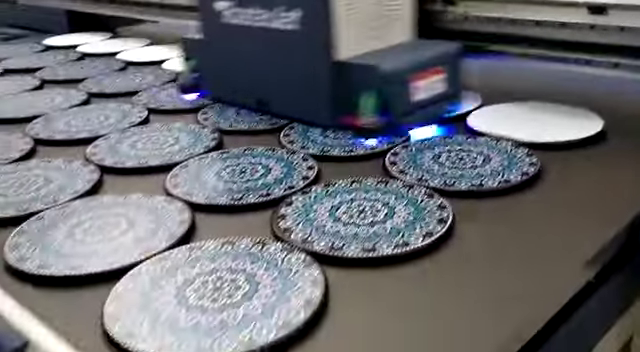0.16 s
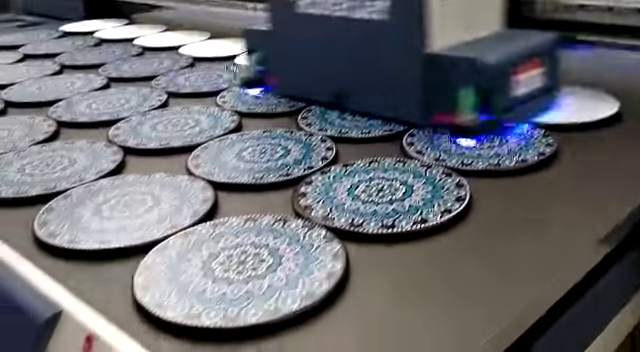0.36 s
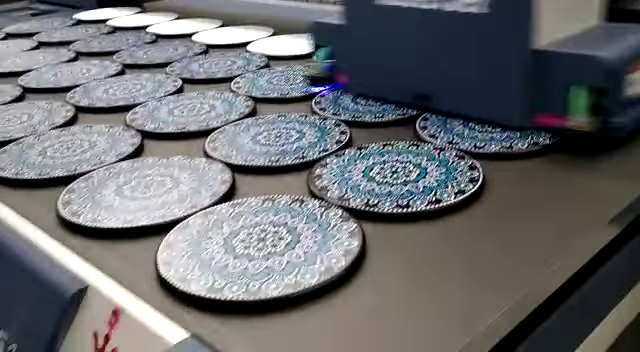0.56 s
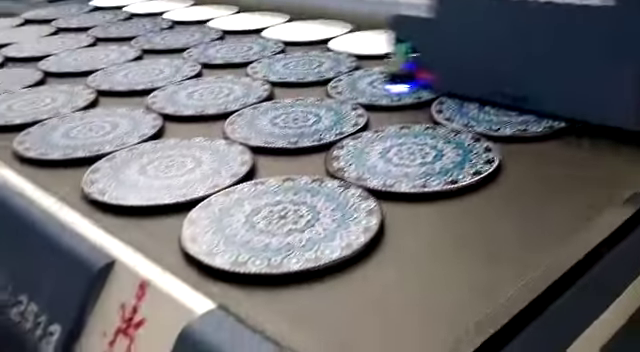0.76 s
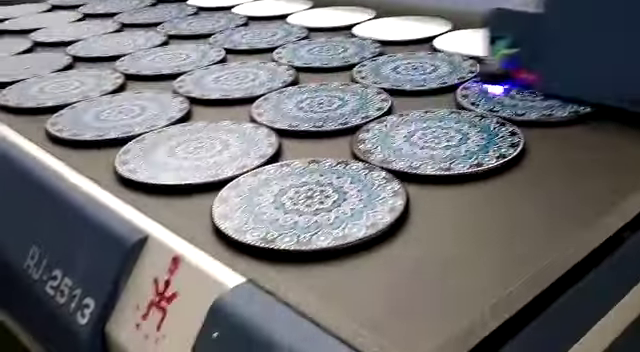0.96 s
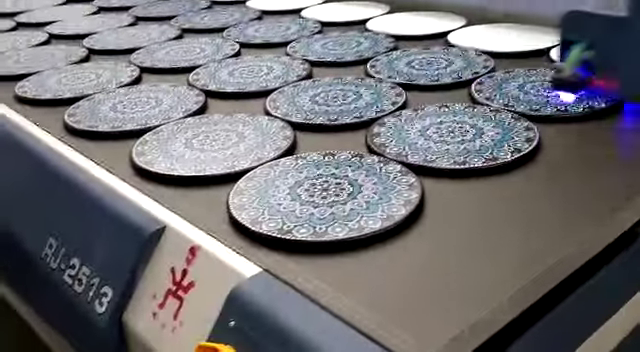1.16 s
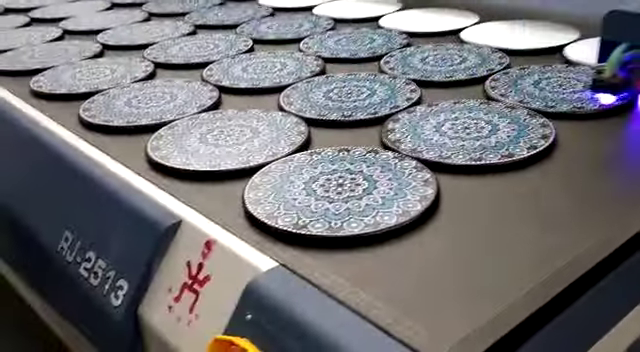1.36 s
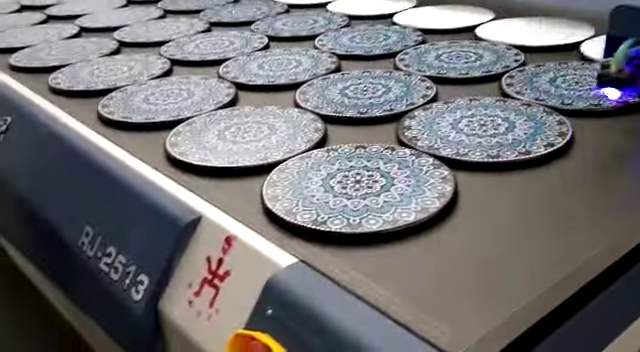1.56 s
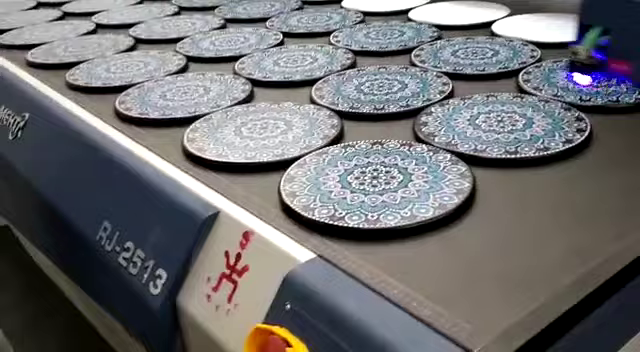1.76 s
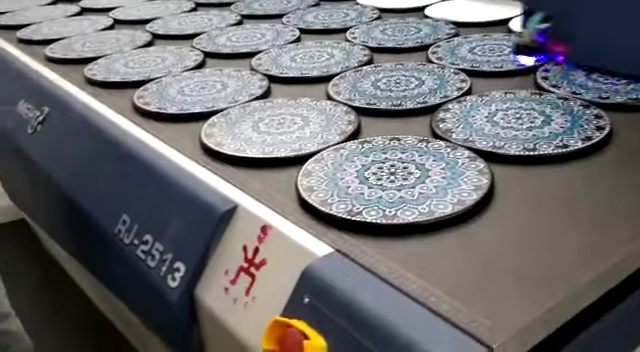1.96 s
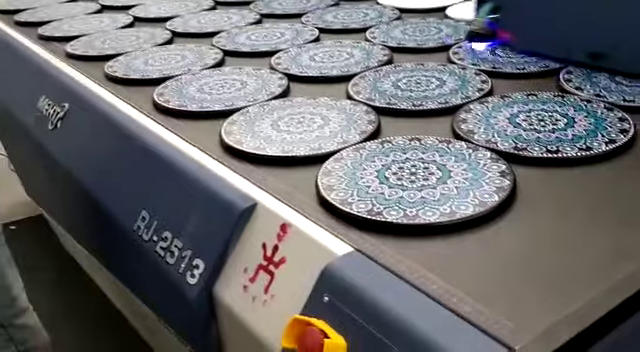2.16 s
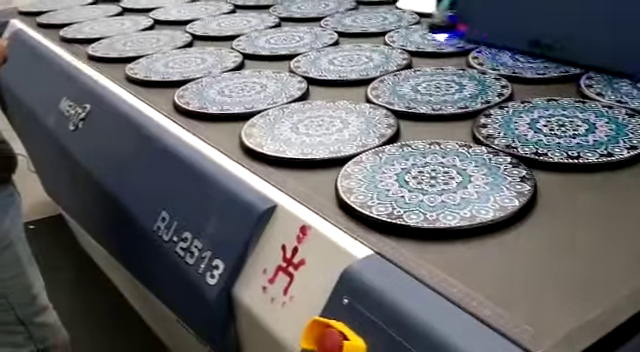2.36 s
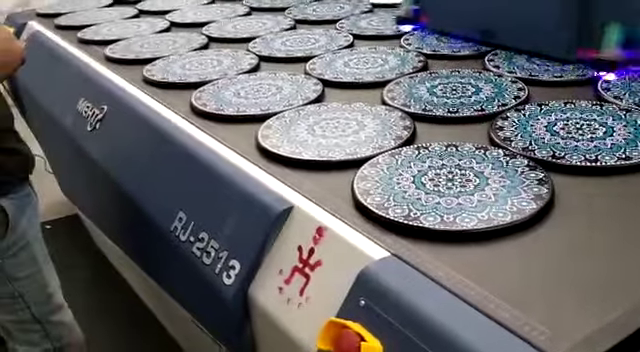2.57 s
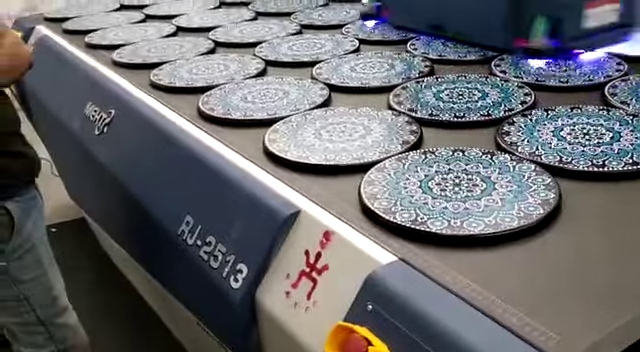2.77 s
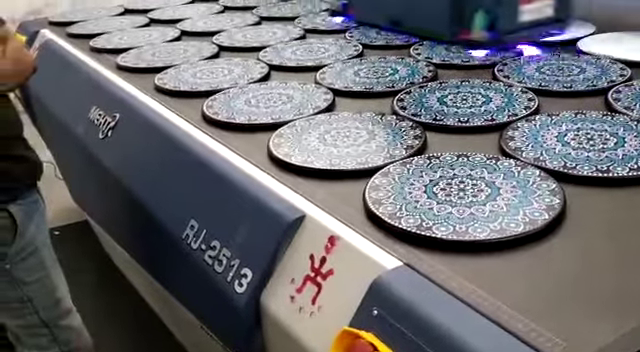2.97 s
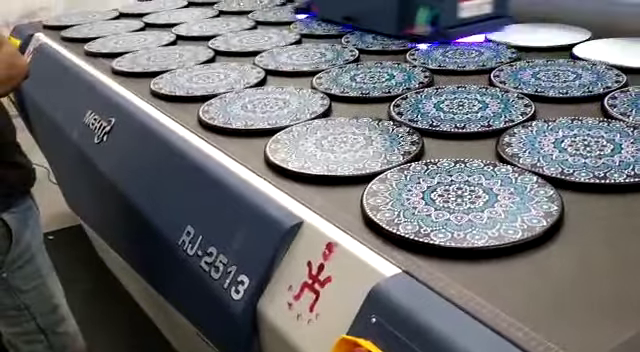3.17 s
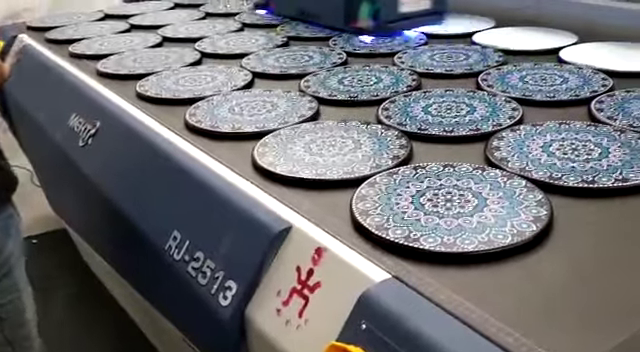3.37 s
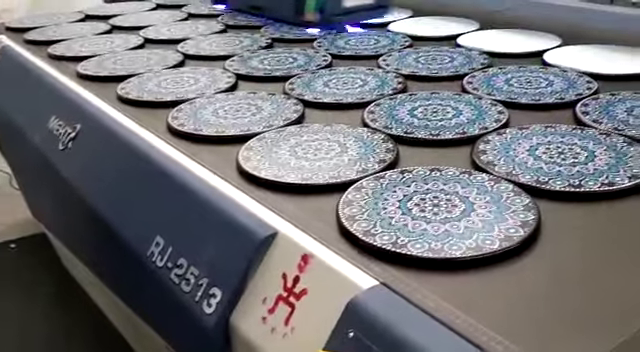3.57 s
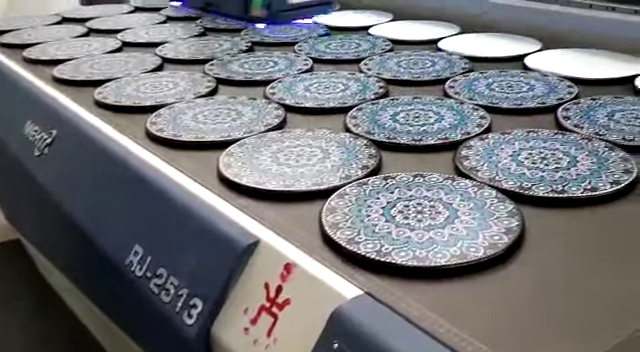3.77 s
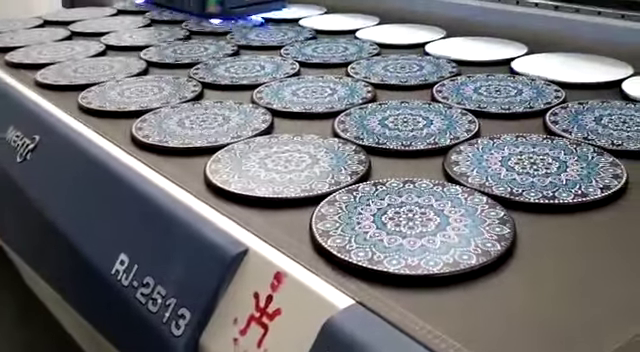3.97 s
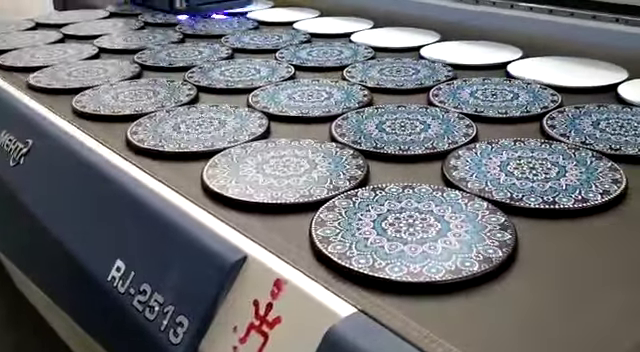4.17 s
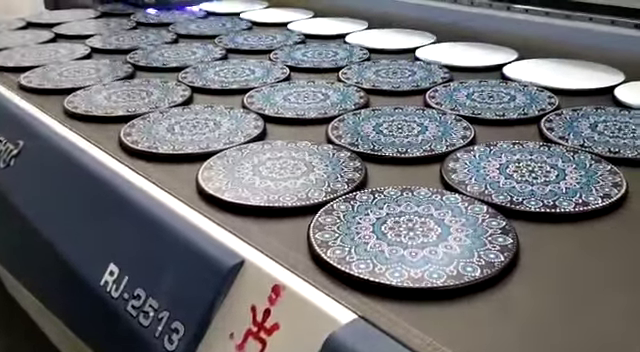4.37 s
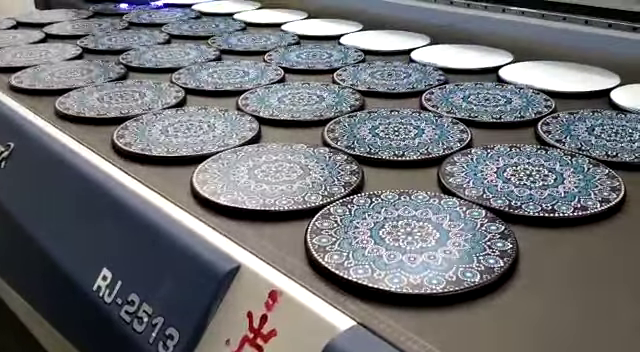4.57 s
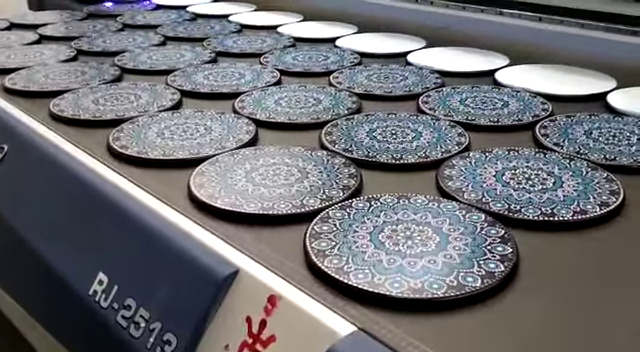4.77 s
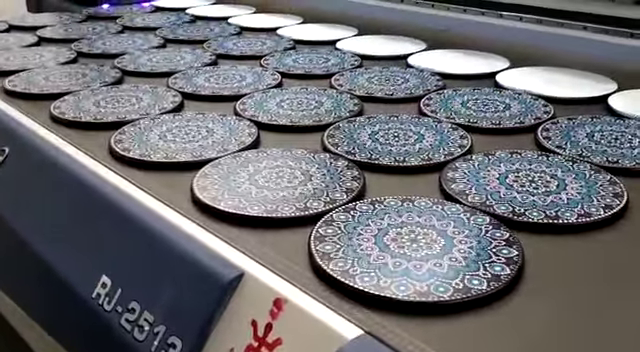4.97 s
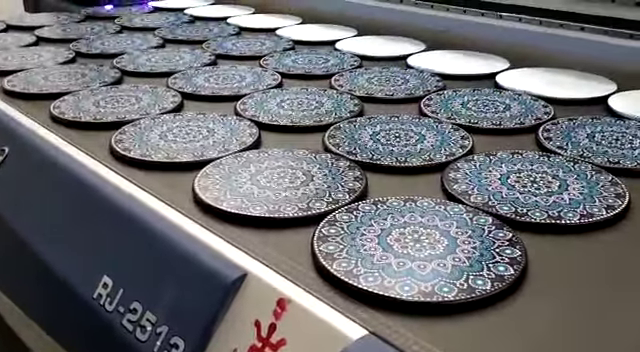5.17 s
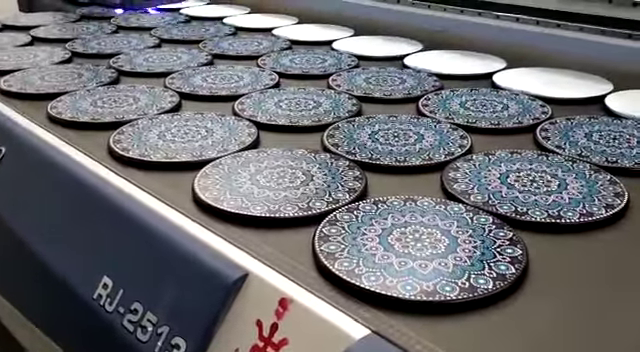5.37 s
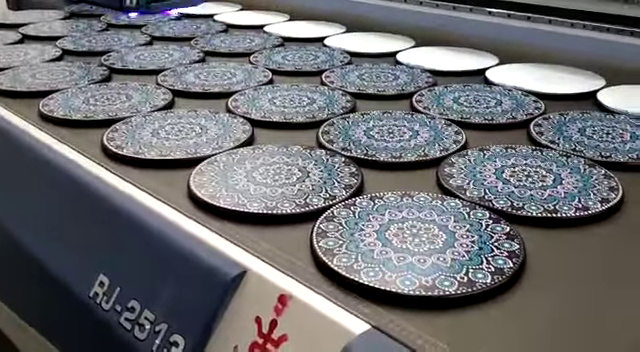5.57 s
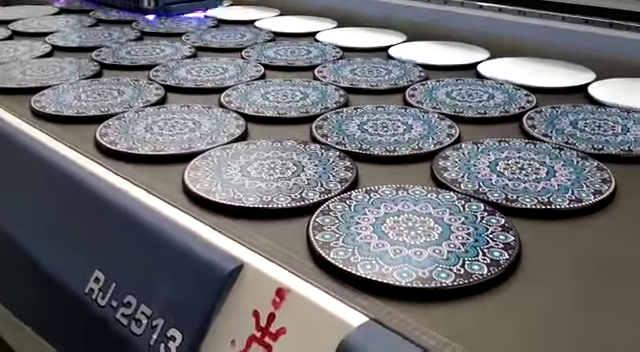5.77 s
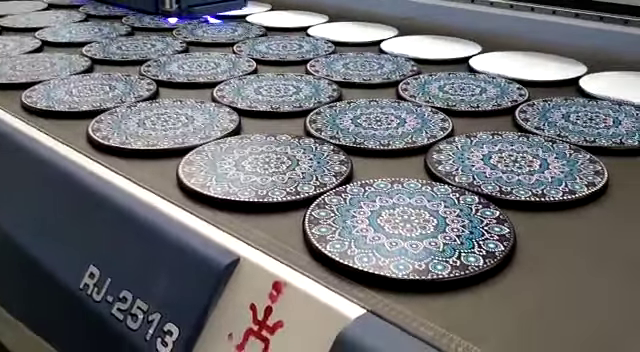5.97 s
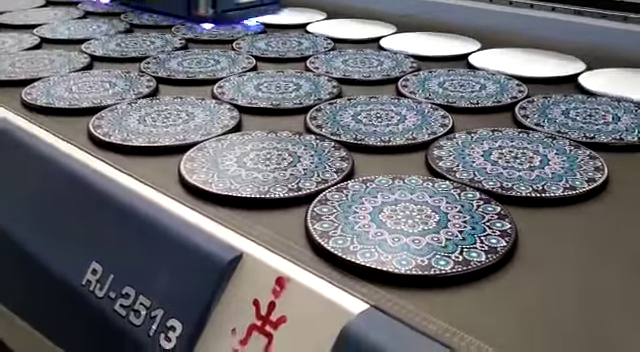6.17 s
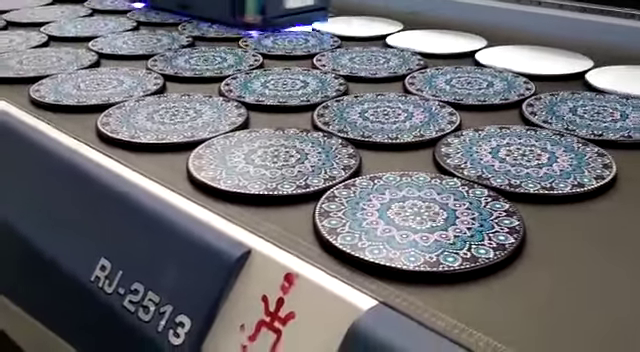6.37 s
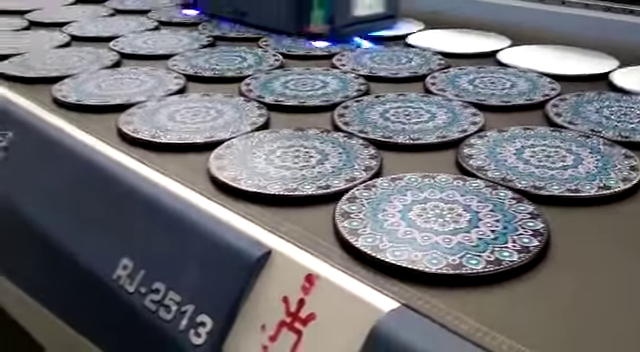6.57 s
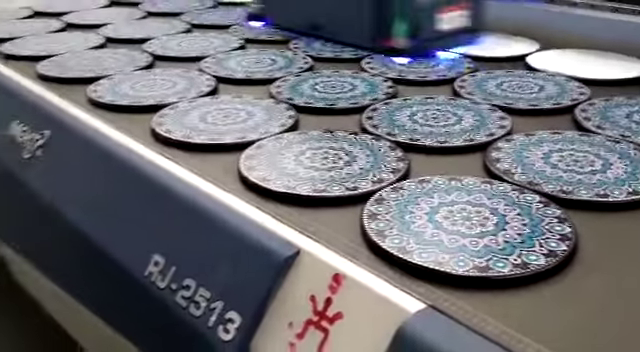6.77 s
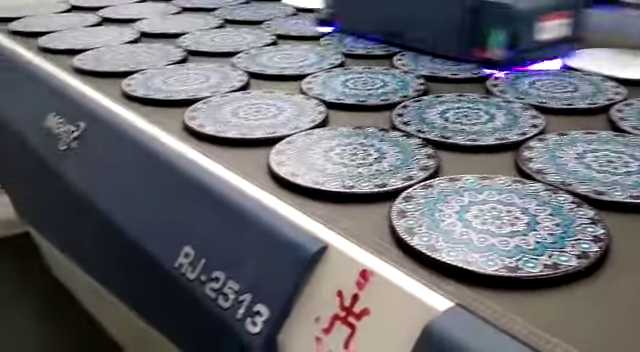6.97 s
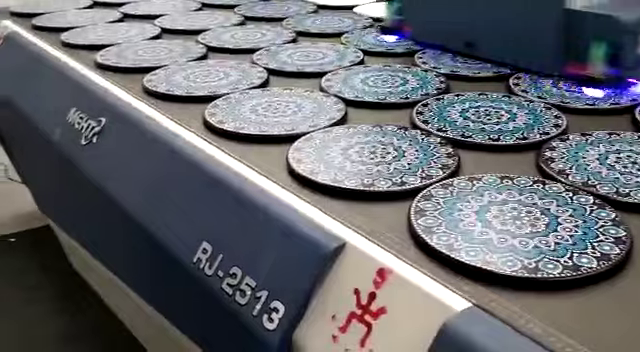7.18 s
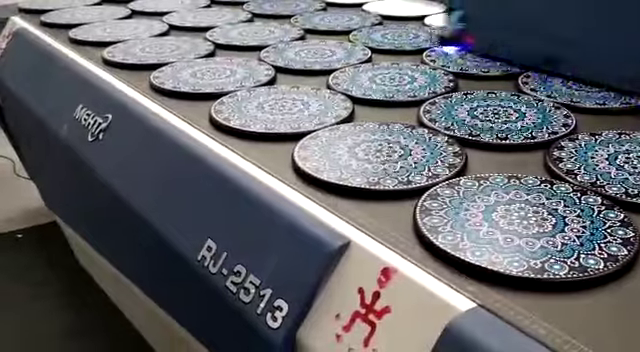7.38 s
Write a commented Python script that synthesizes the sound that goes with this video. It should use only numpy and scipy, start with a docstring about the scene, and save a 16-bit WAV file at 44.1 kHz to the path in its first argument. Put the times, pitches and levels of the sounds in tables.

```python
"""A hum near 400 Hz under bright hiss: a flatbed printer's carriage runs along its rail, slows,
turns round and comes back, indoors. Belt teeth make the hum as tones that follow carriage speed;
rolling guide blocks, cable chain and frame are shaped or resonant noise that follows it too.
An inverter whines as tones one mains frequency apart; a vacuum blower drones below, in air noise
and low lines. Dull thuds and a tiny bright tick are single events."""
import sys
import numpy as np
from scipy import signal
from scipy.fft import rfft, irfft, next_fast_len
from scipy.io import wavfile

SR = 44100
rng = np.random.default_rng(int(sys.argv[2]) if len(sys.argv) > 2 else 0)


def nominal_scale(level):
    """Amplitude ratio for a level in decibels (scalar or array-like)."""
    x = np.asarray(level, float) / 20
    return 10 ** x


def persist_wave(psi):
    """Save psi, clipped to +-1, as 16-bit WAV."""
    counts = np.round(np.clip(psi, -1, 1) * 32767).astype(np.int16)
    wavfile.write(sys.argv[1], SR, np.atleast_2d(counts).T)


N = 327663


def rms_one(x):
    """Scale to rms 1."""
    return x / np.sqrt(np.mean(x ** 2) + 1e-20)


def in_time(rows):
    """Columns of a curve table (t/s first), one value a sample."""
    t_s, *columns = np.transpose(rows)
    return [np.interp(np.arange(N) / SR, t_s, column) for column in columns]


def swells(rows):
    """Sum of Gaussian gain bumps, one per row: t/s, level/dB, half length/s."""
    t = np.arange(N) / SR
    return sum(nominal_scale(db) * np.exp(-((t - at_s) / half_s) ** 2) for at_s, db, half_s in rows)


def drift(rate_hz):
    """Slow chance of spread 1: coarse noise through a double one-pole low-pass."""
    step = 40  # samples per coarse value
    r = np.exp(-2 * np.pi * rate_hz * step / SR)
    noise = rng.standard_normal(N // step + 4002)
    slow = signal.lfilter([1], [1, -2 * r, r * r], noise)[4000:]
    # 4000 coarse values of run-in are dropped
    return np.interp(np.arange(N) / step, np.arange(len(slow)), rms_one(slow - slow.mean()))


def tone(hz):
    """A sine of rms 1 on a steady or moving pitch, random start phase."""
    cycles = np.cumsum(hz * np.ones(N)) / SR
    return np.sqrt(2) * np.sin(2 * np.pi * (cycles + rng.random()))


def shaped(x, spectrum):
    """Filter by a curve of dB on log frequency."""
    size = next_fast_len(N)
    hz, level_db = np.transpose(spectrum)
    log_hz = np.log(np.arange(size // 2 + 1) * SR / size + 1)
    gain = nominal_scale(np.interp(log_hz, np.log(hz), level_db))
    return irfft(rfft(x, size) * gain, size)[..., :N]


def coloured(spectrum):
    """Noise shaped to a spectrum; rms 1."""
    return rms_one(shaped(rng.standard_normal(N), spectrum))


def resonance(x, hz, width_hz):
    """Two-pole resonance, gain 1 on top."""
    r = np.exp(-np.pi * max(width_hz, 2) / SR)
    poles = [1, -2 * r * np.cos(2 * np.pi * hz / SR), r * r]
    return signal.lfilter([(1 - r * r) / 2, 0, (r * r - 1) / 2], poles, x)


def ringing(white, hz, width_hz):
    """Noise twice through one resonance; rms 1."""
    once = resonance(white, hz, width_hz)
    return rms_one(resonance(once, hz, width_hz))


# turns, near end then far end: braking starts t/s, standstill t/s, full speed again t/s
TURN_TIMES = [(.99, 1.599, 2.12), (4.5, 5.1, 5.6)]


def motion():
    """Speed 0-1 on smooth ramps, heading (1 away) and place on the rail (0 near, 1 far)."""
    t, speed, away = np.arange(N) / SR, 1, 0
    for brake_s, stop_s, full_s in TURN_TIMES:
        ramp = np.interp(t, [brake_s, stop_s, full_s], [1, 0, 1])
        speed = speed * np.sin(np.pi / 2 * ramp) ** 2
        away = np.abs(away - (t > stop_s))
    place = np.cumsum(speed * (2 * away - 1))
    return speed, away, (place - place.min()) / np.ptp(place)


def level(full_db, still_db, away_db, far_db, lumpy_db):
    """Layer gain: rolling grows with speed over a standstill floor; heading, place and chance shift it."""
    speed, away, place = motion()
    rolling = nominal_scale(full_db + away_db * away) * speed ** 1.58
    return np.hypot(rolling, nominal_scale(still_db)) * nominal_scale(far_db * place + lumpy_db * drift(5))


TOOTH_HZ = 400.2  # tooth rate at full speed, before flutter
SAG_S, SAG_HALF_S, SAG_SHARE = 5.645, 0.03454, 0.084  # speed sags briefly after the far start
# tooth tone before radiation and dips: t/s, level/dB
TOOTH_CURVE = [(0, -29.5), (.55, -24), (.8, -28.5), (1.1, -24), (2.05, -29.5), (2.4, -31.5), (2.7, -31),
               (3.5, -32), (4.05, -38.5), (4.55, -30), (5.57, -28.5), (6.0, -32), (6.4, -28.5),
               (6.6, -30.5), (7.0, -30), (7.12, -34), (7.43, -37)]
# housing radiates the tone only near full speed: f/Hz, gain/dB
HOUSING_RADIATION = [(10, -56.5), (250, -37), (325, -19), (350, -0.5), (385, -0.5), (400, 1)]
# brief changes of tooth tone level, mostly dips: t/s, change/dB, half length/s
TOOTH_DIPS = [(0.77, -7.5, 0.032), (0.914, -13, .015), (0.996, -14, 0.027), (1.08, -5.5, .012),
              (2.152, -6, 0.033), (2.398, -5, .05), (2.892, -8, 0.021), (4.34, -5, 0.017),
              (4.45, -10, 0.024), (4.582, -19, .015), (5.486, -17, 0.043), (5.65, -4, 0.013),
              (5.76, 0, 0.023), (6.583, -1, .05)]
# tooth harmonics: multiple of tooth rate, level re tooth tone/dB
TOOTH_HARMONICS = [(2, -25.5), (3, -28.5), (4, -32)]


def belt():
    """Teeth mesh at a rate set by speed; pitch and level flutter more below full speed."""
    hz = TOOTH_HZ * motion()[0] * (1 - SAG_SHARE * swells([(SAG_S, 0, SAG_HALF_S)]))
    tone_db = in_time(TOOTH_CURVE)[0] + np.interp(hz, *np.transpose(HOUSING_RADIATION))
    t = np.arange(N) / SR
    for at_s, change_db, half_s in TOOTH_DIPS:
        tone_db = tone_db + change_db * np.exp(-((t - at_s) / half_s) ** 2)
    unsteady = np.clip((hz.max() - hz) / 30, 0, 1)  # 1 from 30 Hz below top rate
    hz = hz * (1 + (.0012 + .006 * unsteady) * drift(14))
    out = nominal_scale(tone_db + (1.36 + 0.92 * unsteady) * drift(9)) * tone(hz)
    for multiple, under_db in TOOTH_HARMONICS:
        out += nominal_scale(tone_db + under_db + 1.1 * drift(34)) * tone(multiple * hz)
    return out


# guide block hiss, shape only: f/Hz, density/dB
HISS_SPECTRUM = [(1650, -67), (2800, -38), (5260, -18), (5900, -11), (6300, -4), (7330, 5), (7840, -1),
                 (8500, -26), (8700, -53), (11300, -66.5), (19100, -120)]


def guide_hiss():
    """Rolling guide blocks: bright noise with a fine level flutter."""
    gain = level(full_db=-27, still_db=-38, away_db=0, far_db=1, lumpy_db=.5)
    flutter = nominal_scale(0.56 * drift(12) + 0.29 * drift(88))
    return gain * flutter * coloured(HISS_SPECTRUM)


# broad rattle, shape only: f/Hz, density/dB
RATTLE_SPECTRUM = [(530, -36), (900, -3.5), (1160, 3), (1310, -3), (1470, -1), (1540, -5), (1700, -17),
                   (2210, -31), (3740, -120)]
# rail resonances: f/Hz, width of each of two passes/Hz, level outward/dB, level inward/dB (re broad rattle)
RAIL_MODES = [(1125, 30, -6, -17), (1200, 22, -11, -13), (1435, 8, -13, -13), (1490, 10, -11, -25),
              (1546, 16, -14, -17), (1598, 12, -13, -24)]
# a thin rail tone stands out: t/s, level/dB, half length/s
RAIL_TONE_SWELLS = [(.38, -51.5, 0.29)]


def rail_rattle():
    """Guide blocks rattle the rail; the two directions load different resonances."""
    away = motion()[1]
    white = rng.standard_normal(N)
    rattle = coloured(RATTLE_SPECTRUM)
    for hz, width_hz, out_db, in_db in RAIL_MODES:
        mode_db = away * out_db + (1 - away) * in_db + 1.5 * drift(2.6)
        rattle = rattle + nominal_scale(mode_db) * ringing(white, hz, width_hz)
    gain = level(full_db=-44.5, still_db=-51.5, away_db=3.5, far_db=0, lumpy_db=1.0)
    return gain * rms_one(rattle) + swells(RAIL_TONE_SWELLS) * tone(1450 + 1.5 * drift(5.6))


def drive_whine():
    """Carriage drive: one high tone, amplitude proportional to speed."""
    full_speed_db = -45 + 1.5 * drift(1.1)
    return nominal_scale(full_speed_db) * motion()[0] * tone(7584)


# broad chain noise, shape only: f/Hz, density/dB
CHAIN_SPECTRUM = [(940, -27), (1600, 0), (1820, -6), (1940, -8), (2280, -14.5), (2700, -12.5), (3510, -42),
                  (5940, -120)]
# narrow noise lines of the chain, unevenly spaced: f/Hz, width/Hz, level re broad noise/dB
CHAIN_LINES = [(1720, 15, -4.5), (1875, 7.9, -8.5), (1995, 16, -8.5), (2120, 15, -13.5)]
# clatter bursts: t/s, level/dB, half length/s
CHAIN_CLATTER = [(4.07, -48, .05), (5.65, -47.5, 0.12)]


def cable_chain():
    """The unrolling chain: broad noise plus narrow noise lines, with bursts of clatter."""
    white = rng.standard_normal(N)
    noise = coloured(CHAIN_SPECTRUM)
    for hz, width_hz, line_db in CHAIN_LINES:
        noise = noise + nominal_scale(line_db + 1.8 * drift(2.3)) * rms_one(resonance(white, hz, width_hz))
    rolling = level(full_db=-54, still_db=-63, away_db=-2.5, far_db=4, lumpy_db=1.4)
    return np.hypot(rolling, swells(CHAIN_CLATTER)) * rms_one(noise)


# frame rumble, shape only: f/Hz, density/dB
RUMBLE_SPECTRUM = [(100, -40.5), (170, -16.5), (260, -9), (340, -14.5), (430, -3.5), (480, -10.5),
                   (630, -9.5), (790, -15), (870, -17.5), (1100, -14.5), (1430, -49), (2400, -120)]


def frame_rumble():
    """The frame rumbles: low shaped noise."""
    gain = level(full_db=-38, still_db=-36.5, away_db=-7, far_db=-5, lumpy_db=1.5)
    return gain * coloured(RUMBLE_SPECTRUM)


GANTRY_HZ = 359.6
RING_SHARE = .45  # part of jolt power that is a clear gantry tone
# bed booms as the carriage passes near: t/s, level/dB, half length/s
BED_BOOMS = [(.18, -45.5, .05), (.39, -39, 0.035), (.91, -36, 0.056), (6.89, -40.5, 0.038),
             (7.31, -37, 0.097)]
# gantry jolts in braking and starting: t/s, level/dB, half length/s
GANTRY_JOLTS = [(1.11, -33, .03), (1.28, -37, 0.022), (1.37, -37, 0.061), (2.03, -34, 0.034),
                (4.62, -28, 0.031), (4.7, -33, .03), (4.77, -33, .04), (5.33, -36, .04),
                (5.46, -35.5, 0.047), (5.63, -30, 0.057)]


def frame_modes():
    """Noise twice through each frame resonance; jolts ring the gantry and shake the cover."""
    white = rng.standard_normal(N)
    jolts = swells(GANTRY_JOLTS)
    bed = level(full_db=-45, still_db=-60.5, away_db=-6.5, far_db=-8.5, lumpy_db=0)
    gantry = level(full_db=-40.5, still_db=-42, away_db=-5, far_db=-3, lumpy_db=2)
    cover = level(full_db=-44.5, still_db=-46.5, away_db=-0.5, far_db=0.5, lumpy_db=1.5)
    out = np.hypot(bed, swells(BED_BOOMS)) * ringing(white, hz=204, width_hz=11)
    out += np.hypot(gantry, np.sqrt(1 - RING_SHARE) * jolts) * ringing(white, GANTRY_HZ, width_hz=64)
    out += np.hypot(cover, nominal_scale(-7) * jolts) * ringing(white, hz=761, width_hz=144)
    return out + np.sqrt(RING_SHARE) * jolts * tone(GANTRY_HZ + 16 * drift(8))


MAINS_HZ = 50.07
STEADY_SHARE, FADE_HZ = 0.77, 1.3  # steady part of each tone's power; rate of the fading rest
# switching frequency: t/s, f/Hz
CARRIER_CURVE = [(0, 6401.8), (1.5, 6403.2), (4, 6404.0), (7.43, 6403.6)]
# whine at the moving listener, two tone sets take turns:
# t/s, common level/dB, balance/dB, tilt to upper tones/dB per sideband
WHINE_CURVE = [(0, -27.5, 5, -2.5), (.2, -31.5, -1, 0), (.38, -27, -3.5, -0.5), (.75, -35, -2.5, -2),
               (1.05, -29.5, 0.5, 1.5), (1.35, -26.5, -1.5, 0.5), (1.63, -32.5, -8, 0), (2.0, -34, -0.5, 1),
               (2.4, -31, 8, 0), (2.9, -32.5, -3, -1.5), (3.15, -31, 1, 1.5), (3.55, -35, 1.5, 1),
               (3.95, -32, 1.5, 1.5), (4.3, -34, -1.5, 2), (4.75, -37, 5.5, -0.5), (5.2, -33.5, 7.5, -1.5),
               (5.5, -34.5, 7.5, -1.5), (5.85, -34.5, 5, -1.5), (6.1, -33, 5, .5), (6.5, -29.5, -2.5, 0),
               (6.9, -34, -1.5, -1), (7.43, -31.5, -2, -1)]
# strong tones: mains multiples off carrier, level re common/dB, share of balance taken
STRONG_SIDEBANDS = [(-3, -15.5, 0), (-2, -6.5, -1.2), (-1, -7.5, 0.79), (0, -15, -0.15), (1, -6.5, 0.6),
                    (2, -5.5, 0.83), (3, -9, -0.92)]
# weak tones of the comb: f/Hz, rms level/dB
WEAK_TONES = [(6053, -57), (6103, -53), (6153, -54), (6203.2, -50), (6603.7, -46), (6653.8, -53),
              (6704, -55)]
# another switching tone: f/Hz, rms level/dB
OTHER_SWITCHING = [(8000, -58)]


def inverter():
    """Switching carrier with sidebands at mains multiples; room echoes fade each strong tone alone."""
    carrier_hz, = in_time(CARRIER_CURVE)
    whine_db, balance_db, tilt_db = in_time(WHINE_CURVE)
    out = np.zeros(N)
    loose = np.sqrt((1 - STEADY_SHARE) / 2)
    for k, level_db, taken in STRONG_SIDEBANDS:
        fade = np.hypot(np.sqrt(STEADY_SHARE) + loose * drift(FADE_HZ), loose * drift(FADE_HZ))
        tone_db = whine_db + level_db + taken * balance_db + k * tilt_db
        out += nominal_scale(tone_db) * fade * tone(carrier_hz + k * MAINS_HZ)
    for hz, level_db in WEAK_TONES + OTHER_SWITCHING:
        out += nominal_scale(level_db + 2.3 * drift(0.77)) * tone(hz)
    return out


# rotor and mains lines; walking along the table changes the balance:
# f/Hz, rms level at first/dB, rms level at last/dB, twice the pitch spread/Hz
DRONE_LINES = [(47.7, -37, -36, .5), (75.5, -54, -52.5, 5.0), (99.3, -60, -48.5, 1.7),
               (147.1, -55.5, -50.5, 1.6), (197.4, -63.5, -58.5, 2.5), (297.3, -43.5, -51.5, 6.0),
               (372, -52.5, -54.5, 4.5), (525.6, -50.5, -53, 3.86)]
# workshop air and blower, shape only: f/Hz, density/dB
AIR_SPECTRUM = [(24, -30), (40, -0.5), (69, -6), (107, -8.5), (188, -10), (301, -12.5), (564, -7),
                (706, -10), (903, -5), (1690, -22.5), (3170, -29), (5680, -19), (6490, -7.5), (7600, -30.5),
                (8500, -41), (11000, -68), (18700, -120)]
# air noise: t/s, rms level/dB
AIR_CURVE = [(0, -38), (1.6, -39.5), (3, -39), (4.6, -38.5), (5.4, -37.5), (6.2, -40), (7.43, -41)]


def blower():
    """Broad air noise under a few low, wavering rotor and mains lines."""
    out = nominal_scale(in_time(AIR_CURVE)[0]) * coloured(AIR_SPECTRUM)
    for hz, first_db, last_db, waver_hz in DRONE_LINES:
        line_db = np.linspace(first_db, last_db, N) + 1.6 * drift(7.4)
        out += nominal_scale(line_db) * tone(hz + waver_hz * drift(3.83) / 2)
    return out


# dull low bumps: t/s, envelope peak level/dB, f/Hz
THUD_EVENTS = [(4.12, -33, 57.7), (5.5, -37.5, 54.3)]


def thuds():
    """Short low swells of a few cycles: sines under a Gaussian envelope."""
    t = np.arange(N) / SR
    out = np.zeros(N)
    for at_s, db, hz in THUD_EVENTS:
        out += swells([(at_s, db, 0.024)]) * np.sin(2 * np.pi * hz * (t - at_s))
    return out


# tiny bright tick just after the first turn: t/s, approximate peak level/dB
TICK_EVENTS = [(1.735, -30.5)]


def ticks():
    """A click through a wide bright resonance."""
    width_hz = 700
    clicks = np.zeros(N) + 1e-18
    for at_s, db in TICK_EVENTS:
        clicks[int(at_s * SR)] = nominal_scale(db) * SR / (np.pi * width_hz)  # undoes the filter's peak loss
    return resonance(clicks, 7500, width_hz)


def scene():
    """All sources reach one microphone."""
    carriage = guide_hiss() + rail_rattle() + drive_whine() + cable_chain()
    frame = frame_rumble() + frame_modes()
    mix = belt() + carriage + frame + inverter() + blower() + thuds() + ticks()
    return mix[None]


# recording response: f/Hz, gain/dB
RECORDING_RESPONSE = [(20, -2), (40, -2), (46, -0.5), (112, -1.5), (128, -8.5), (140, -1), (2500, -1.5),
                      (3000, -3), (3500, 2.5), (4500, 1), (7750, 0.5), (7900, -1.5), (8500, -0.5),
                      (8600, -26), (9000, -41)]


def coloration(dry):
    """Recording colour: a dip near 3 kHz and a steep band limit near 8.55 kHz."""
    return shaped(dry, RECORDING_RESPONSE)


def band_limit(x):
    """A steep low-pass at the top of the band."""
    return signal.sosfilt(signal.butter(12, 9030, fs=SR, output="sos"), x)


def record(dry):
    """The scene with its recording colour, as finished sound."""
    mix = coloration(dry)
    return band_limit(mix)


dry = scene()
out = record(dry)
persist_wave(out)
```